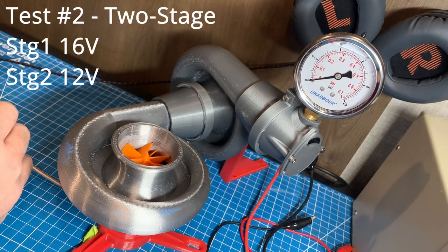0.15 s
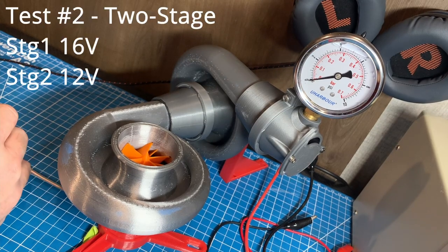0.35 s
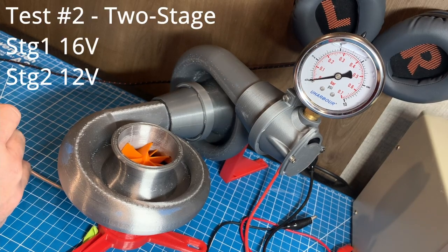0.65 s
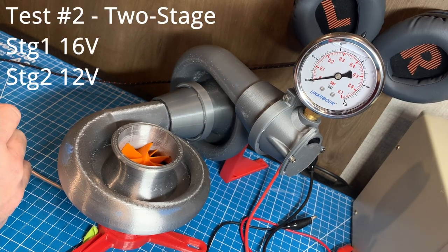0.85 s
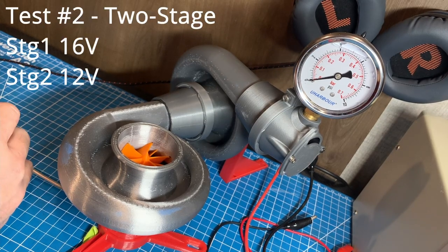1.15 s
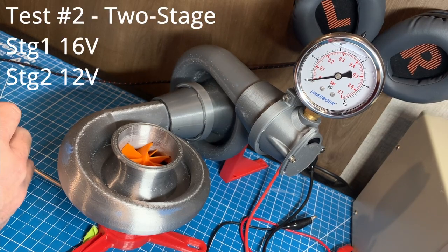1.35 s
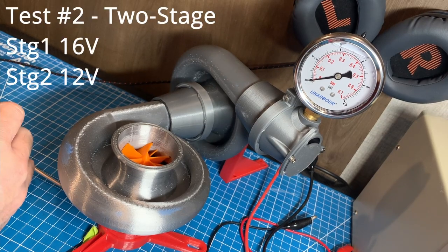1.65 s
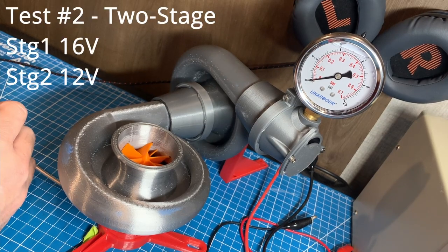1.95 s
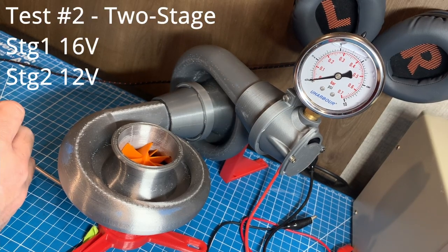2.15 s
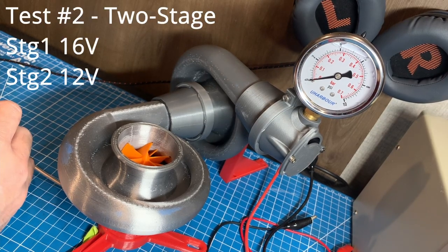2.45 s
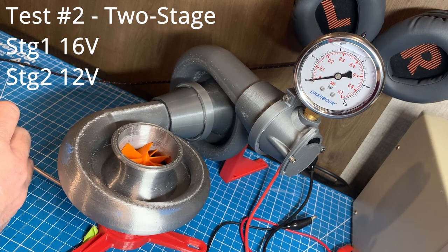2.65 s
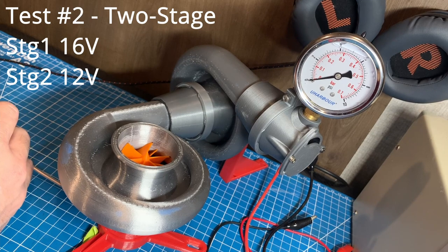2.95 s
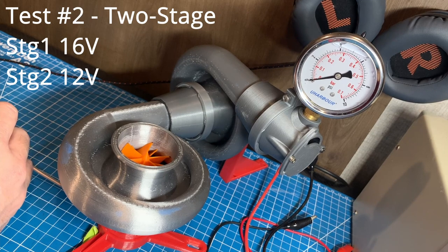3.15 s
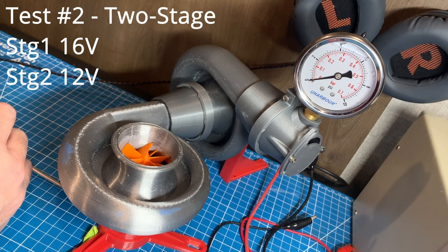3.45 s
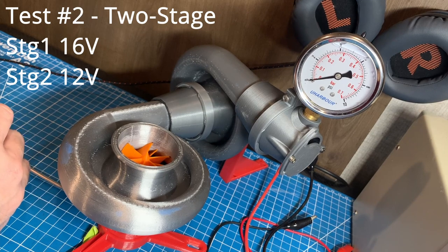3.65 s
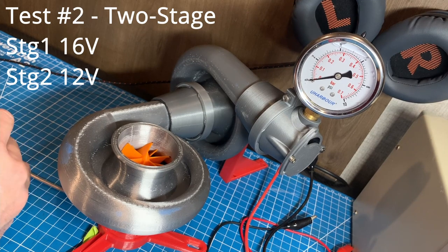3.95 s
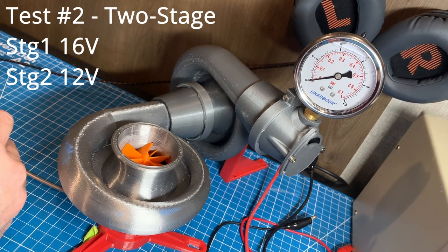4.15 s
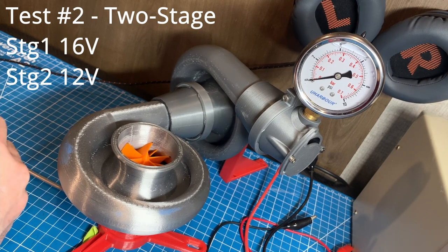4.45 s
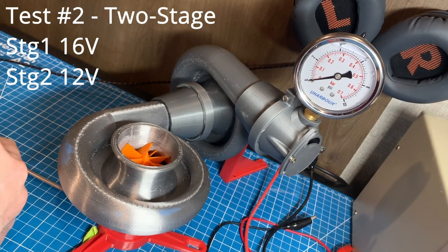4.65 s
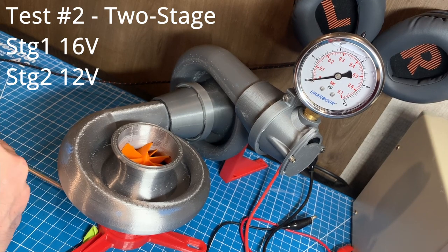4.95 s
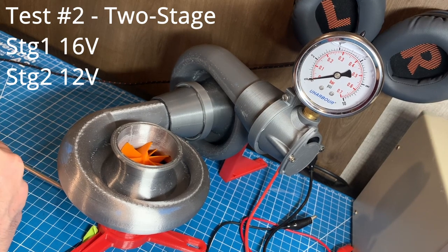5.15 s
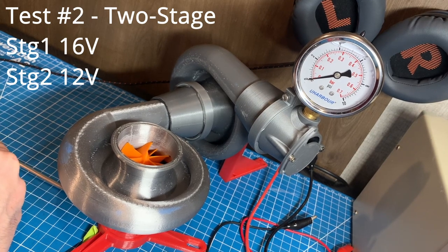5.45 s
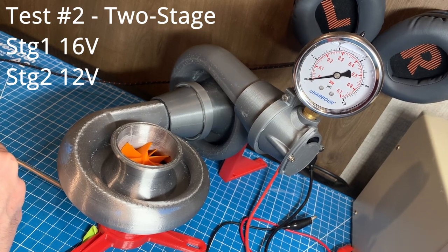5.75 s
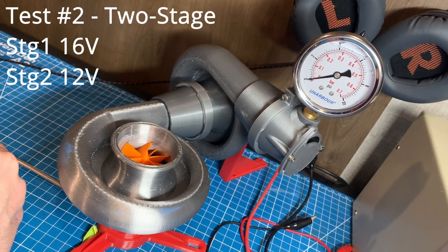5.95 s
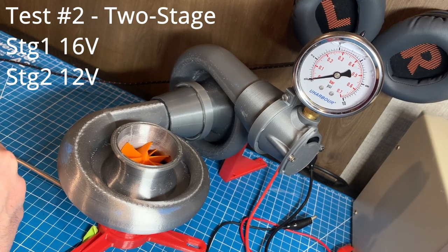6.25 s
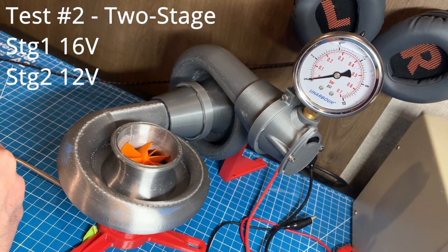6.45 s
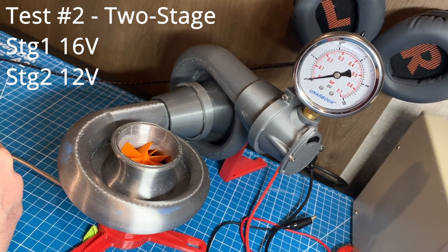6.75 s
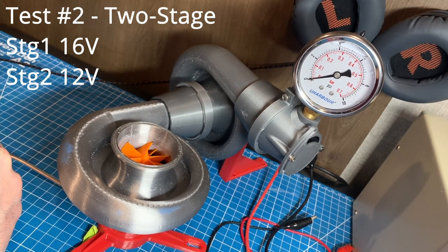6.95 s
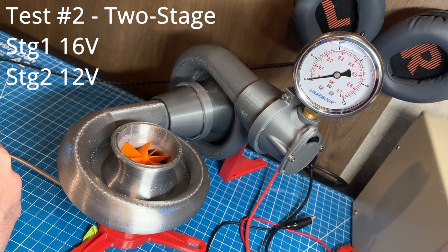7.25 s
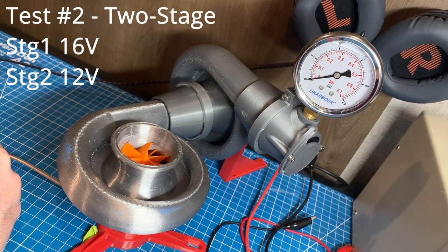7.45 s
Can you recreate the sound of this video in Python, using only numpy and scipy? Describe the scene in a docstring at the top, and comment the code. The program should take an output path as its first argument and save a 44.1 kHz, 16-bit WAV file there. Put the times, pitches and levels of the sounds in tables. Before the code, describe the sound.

Close and dry, in mono: a fast-spinning motor and impeller rise smoothly from near silence to a constant drone. Hum and layered whining sit over hissing, slightly hollow airflow, peppered with tiny rapid metallic ticks and very short dropouts in the hiss. After five seconds the pitch stays put but the whine surges brighter, a loose part buzzes briefly, then it eases back and keeps running to the end.

```python
"""Two-stage compressor on a desk

A home-made two-stage centrifugal compressor runs almost steadily, fading in over two seconds; one microphone
channel, with no distance or room added. The faster shaft hums and whines on its multiples, the other stage
adds weak tones, and filtered noise makes the air rush through the housings, with a rough warble. Faint quick
ticks ring on top; the whine swells and a buzz joins it for about a second, and the rush drops out now and then."""
import sys
import numpy as np
from scipy import signal
from scipy.fft import rfft, irfft
from scipy.io import wavfile

SR = 44100
rng = np.random.default_rng(int(sys.argv[2]) if len(sys.argv) > 2 else 0)


def master(y):
    """Save y as 16-bit WAV."""
    cut = np.clip(np.atleast_2d(y).T, -1, 1)
    pcm = np.round(cut * 32767)  # scale
    wavfile.write(sys.argv[1], SR, pcm.astype(np.int16))


N = 335160
T = np.arange(N) / SR

# Rush of air, shape of its spectrum. Each row: frequency in Hz, relative density in dB.
AIR = [(40, -38), (60, -28), (110, -23), (165, -15.5), (330, -14), (570, -17), (1050, -13.5), (1700, -20.5),
       (2900, -23.5), (5000, -25), (7700, -25.5), (8600, -21), (11000, -21.5), (13300, -27), (15800, -24.5)]
# Resonances of the housings and the pipe between them. Each row: frequency in Hz, width in Hz, relative peak in dB.
HOUSING = [(163, 25, -7), (228, 30, -12), (411, 25, -8), (672, 45, -5), (745, 45, -4), (802, 28, -4.5),
           (1040, 45, -6), (1105, 40, -10), (1235, 40, -13), (1440, 70, -14), (1545, 50, -14),
           (1885, 70, -13), (2090, 70, -22), (2270, 55, -18), (2390, 70, -21), (2560, 90, -20),
           (3000, 70, -18), (3930, 200, -26), (4280, 120, -23), (4620, 130, -27), (5250, 170, -26),
           (5650, 220, -26), (6500, 160, -24), (8740, 250, -20.5), (10940, 160, -18), (14280, 350, -23)]
# Brief drop-outs of the rush. Each row: centre in seconds, length in seconds, depth in the treble in dB.
DROPS = [(0.152, 0.012, 15), (0.814, 0.011, 18), (1.006, 0.011, 15), (1.059, 0.028, 23), (1.176, 0.009, 17),
         (2.115, 0.01, 17), (2.287, 0.01, 17), (2.328, 0.01, 15), (2.562, 0.013, 17), (2.734, 0.011, 15),
         (2.872, 0.026, 29), (2.925, 0.008, 19), (3.075, 0.011, 16), (3.117, 0.01, 16), (3.363, 0.028, 25),
         (3.566, 0.012, 15), (3.832, 0.025, 28), (3.928, 0.013, 16), (4.654, 0.012, 17), (5.272, 0.012, 18),
         (5.656, 0.01, 14), (5.743, 0.01, 14), (5.858, 0.031, 22), (6.059, 0.013, 14), (6.231, 0.011, 14),
         (6.318, 0.01, 14), (6.509, 0.011, 18), (6.616, 0.008, 18), (6.765, 0.009, 16), (6.839, 0.029, 18),
         (6.936, 0.009, 13), (7.0, 0.01, 16), (7.426, 0.01, 14), (7.502, 0.044, 29)]
# Level of the warble. Each row: time in seconds, level in dB.
WARBLE = [(1, -45.5), (2.2, -52.5), (2.53, -45.5), (2.75, -50), (3.05, -45.5), (3.17, -52), (3.4, -47.5),
          (4.9, -47), (4.968, -39), (5.005, -63), (5.1, -49), (5.75, -45), (5.96, -51), (6.2, -42),
          (6.32, -51), (6.44, -41.5), (6.6, -47), (7.6, -46)]
# Tones of the other stage. Each row: frequency in Hz, level in dB, unsteadiness in Hz.
TONES = [(184, -61, 4), (481, -55, 4), (1437, -69, 6), (2272, -70, 8), (2391, -70.5, 6), (2998, -67, 7),
         (3951, -73, 8), (4269, -69, 8), (6503, -72, 10)]
# Ticks with their own levels, mostly the stronger ones; faint ticks fill the time between. Each row: start in
# seconds, relative level in dB.
TICKS = [(0.082, 2.5), (0.341, -2), (0.383, 4), (0.473, 0), (0.648, 3), (0.689, -4), (0.853, -1),
         (0.983, -1), (1.207, 1.5), (1.296, 3), (1.336, 0), (1.516, -2), (1.686, -1), (1.818, 2),
         (2.049, 1), (2.091, -3), (2.177, 2), (2.267, 0), (2.402, 0), (2.538, 0), (2.583, -2), (2.625, 0),
         (2.795, 3), (2.839, 2.5), (3.146, -2), (3.189, 5.5), (3.32, -2), (3.495, 0), (3.541, 1),
         (3.592, -2), (3.681, 0), (3.86, 0), (3.905, 0), (3.989, -3), (4.03, -2), (4.077, -1), (4.208, -1),
         (4.252, 2), (4.296, 1), (4.466, 1), (4.513, -3), (4.558, -3), (4.6, -6), (4.856, -1), (5.069, -3),
         (5.113, 0), (5.159, 0), (5.246, -2), (5.337, -4), (5.472, 0), (5.553, -4), (5.682, 3), (5.81, 2),
         (5.902, 3), (5.989, 0), (6.032, 1), (6.167, 2), (6.208, 2), (6.3, 0), (6.343, -2), (6.389, 0),
         (6.432, -1), (6.599, 1), (6.643, 1), (6.689, 0), (6.734, 0.5), (6.859, -4), (6.903, 0), (7.125, 1),
         (7.168, 2), (7.254, 2), (7.553, -0.5)]
# What the ticking rings with. Each row: frequency in Hz, 60 dB decay time in seconds, relative level in dB.
TICK_MODES = [(4400, .003, -2), (5700, .010, -5), (7200, .002, -1), (8750, .010, 3.5), (11500, .002, 6),
              (14200, .003, 7.5)]
# What the buzz rings with. Each row: frequency in Hz, 60 dB decay time in seconds, relative level in dB.
BUZZ_MODES = [(2200, .007, -5), (3050, 0.0052, 33), (4230, 0.0046, 29), (4900, 0.0073, -21),
              (10800, .003, 5)]
# Hum of the unbalanced shaft, before its trim. Each row: time in seconds, level in dB.
HUM = [(1.4, -36), (2.2, -35.5), (3.75, -35.5), (4.12, -34.5), (4.3, -36.5), (4.5, -33), (4.9, -34),
       (5.15, -36), (5.5, -34.5), (5.95, -36.5), (6.3, -36), (7.6, -35)]
# Brief jolts of the hum. Each row: centre in seconds, rise in dB.
JOLTS = [(1.38, 4.5), (1.637, 7.5), (1.86, 2), (3.868, 5), (4.03, 2.5), (4.125, 2.5), (4.285, 5.5),
         (5.345, 3.5), (5.498, 4.5), (5.63, 4)]
# Whine lines, before their trim. Each row: multiple of the shaft speed, level in dB,
# change once the shaft has settled in dB, change at full swell in dB.
WHINE = [(2, -68, 1, 0), (5, -54, -1, 2), (7, -59, -4, 6), (10, -70, -10, 9), (11, -73, -1, 6),
         (12, -70, 0, 2), (13, -66, 1, 5), (17, -80, -3, 14), (18, -81, 5, 5), (20, -64, 1, -7),
         (21, -74, -2, 9), (22, -69, -5, -1), (23, -69, 4, 3), (24, -69, -1, 0), (25, -62, -1, 4),
         (26, -62, -14, 4), (27, -63, 5, -3), (28, -59, 0, 0), (29, -62, -4, -13), (30, -57, 0, -1),
         (31, -63, 2, 0), (32, -66, -3, 4), (33, -70, -1, 3), (34, -59, -1, 6), (35, -65, -3, 7),
         (36, -70, 8, 4), (37, -72, 4, 1), (38, -70, 8, 1), (39, -63, -3, 2), (40, -71, 1, 4),
         (41, -68, -2, -1), (44, -66, -2, 1), (45, -67, 5, 2), (46, -72, 2, 0), (47, -65, 1, 2),
         (48, -61, -2, 1)]
# Leading whine lines, which swell and fade in turn, before their trim; each is named for its multiple
# of the shaft speed. Each row: time in seconds, level in dB.
THIRD = [(1, -59), (3.4, -58), (3.8, -54), (4.3, -56.5), (4.75, -49), (5.05, -59), (5.27, -42),
         (5.7, -48.5), (6.1, -50.5), (6.4, -59.5), (7.6, -58)]
FOURTH = [(1, -55.5), (2.2, -58.5), (3.8, -57.5), (5.05, -62), (5.25, -48), (5.7, -49.5), (6.15, -51.5),
          (6.4, -63), (7.6, -65)]
SIXTH = [(1, -53), (2.9, -52.5), (4.9, -53.5), (5.35, -64), (5.65, -62), (5.9, -55.5), (6.3, -59)]
EIGHTH = [(1, -54), (2.8, -57), (4.9, -58.5), (5.75, -53), (6.4, -64)]
NINTH = [(1, -56), (2, -54), (4.5, -59.5), (5.45, -53.5), (6, -63), (6.25, -55), (7.6, -57)]
FOURTEENTH = [(1.3, -57), (3.6, -59.5), (4.85, -74), (5.15, -55.5), (5.75, -62), (6, -60), (6.25, -57),
              (7, -58), (7.6, -66)]
FIFTEENTH = [(1, -59), (3.4, -74), (3.9, -77), (4.8, -77), (5.15, -61), (5.5, -73), (5.72, -53), (6, -64),
             (7, -62.5), (7.6, -67)]
SIXTEENTH = [(2, -65), (3, -71), (4.5, -63.5), (5.7, -70), (5.9, -56.5), (6.15, -65), (6.35, -62),
             (6.8, -66), (7.6, -62)]
# The leading lines together. Each row: multiple of the shaft speed, level curve.
LEADERS = [(3, THIRD), (4, FOURTH), (6, SIXTH), (8, EIGHTH), (9, NINTH), (14, FOURTEENTH), (15, FIFTEENTH),
           (16, SIXTEENTH)]

# the shaft sags a little from its first speed, then holds (turns per second)
START_HZ, SAG_HZ_PER_S, SETTLED_HZ = 318.76, 0.15, 318.03
# when the shaft settles under its load, and how long that takes (s)
SETTLE_AT_S, SETTLE_S = 3.34, 0.62
# the whine surges once, and a share of the surge lingers
SURGE_AT_S, SURGE_ATTACK_S, SURGE_HOLD_S, SURGE_RELEASE_S = 5.03, 0.12, 0.33, 0.91
LINGER_SHARE = 0.68
# straight fade-in from a small opening (share 0-1)
FADE_S, OPENING = 2.31, 0.045
JOLT_S = 0.01
TICK_HZ = 22.85  # ticks per second
TOP_HZ = 15700


def undb(db):
    """Decibels to gain."""
    return 10 ** (np.asarray(db) / 20)


def curve(rows):
    """Rows of (s, value) joined by straight lines."""
    return np.interp(T, *np.transpose(rows))


def unit(x):
    """Scale to rms 1."""
    return x / np.sqrt(np.mean(x ** 2))


def noise(gain_at):
    """Noise of rms 1 whose spectrum follows a function of frequency."""
    hz = np.arange(N // 2 + 1) * SR / N + 1e-3  # kept off zero for logarithms
    spectrum = rfft(rng.standard_normal(N))
    return unit(irfft(spectrum * gain_at(hz), N))


def walk(rate_hz):
    """Slow chance of spread 1, with little above the given rate."""
    return noise(lambda hz: 1 / (1 + (hz / rate_hz) ** 2))


def throb(rate_hz):
    """Chance of spread 1 that swings at about the given rate."""
    return noise(lambda hz: 1 / (1 + (2 * np.log(hz / rate_hz)) ** 4))


def turns_of(hz):
    """Turns made so far at a moving speed."""
    return np.cumsum(hz) / SR


def split(x, edge_hz=3050):
    """The parts of a sound below and above an edge."""
    low = signal.sosfiltfilt(signal.butter(8, edge_hz, fs=SR, output="sos"), x)
    return low, x - low


def bell(x):
    """Smooth bump of height 1 from a squared or steeper distance."""
    return np.exp(-np.minimum(x, 20))


def ring_of(modes):
    """Twenty milliseconds of a struck part's ring: a sum of dying sines."""
    age = T[:SR // 50]
    ring = 0
    for hz, t60, db in modes:
        decay = np.exp(-np.log(1000) * age / t60)
        ring = ring + undb(db) * decay * np.sin(2 * np.pi * hz * age)
    return ring


def settled():
    """How far the shaft has settled under its load, 0-1."""
    return np.clip((T - SETTLE_AT_S) / SETTLE_S, 0, 1)


def swell_of(rest=0):
    """Strength of the surge, 0-1: it rises, holds and falls back to a resting share."""
    rise = np.clip((T - SURGE_AT_S) / SURGE_ATTACK_S, 0, 1)
    fall = np.clip((T - SURGE_AT_S - SURGE_ATTACK_S - SURGE_HOLD_S) / SURGE_RELEASE_S, 0, 1)
    return rise * np.maximum(1 - fall, rest)


def drop_outs(stretch=1):
    """Depth in dB of the rush's drop-outs, flat-bottomed with soft edges."""
    depth = 0
    for s, length, depth_db in DROPS:
        distance = 2 * (T - s) / (stretch * length)
        depth = np.maximum(depth, depth_db * bell(distance ** 4))
    return depth


def rush(turns, air_db=-45.5, ring_db=-47.0):
    """Turbulent air hisses and rings the housings; the impeller chops the hiss once a turn."""
    points_hz, points_db = np.transpose(AIR)

    def air_gain(hz):
        low_cut = hz / np.hypot(hz, 55)
        return undb(np.interp(np.log(hz), np.log(points_hz), points_db)) * low_cut

    def housing_gain(hz):
        return sum(undb(db) / (1 + (2 * (hz - f) / width) ** 2) for f, width, db in HOUSING)

    body, hiss = split(undb(air_db) * noise(air_gain) + undb(ring_db) * noise(housing_gain))
    flow = undb(0.3 * walk(5))
    chop = 1 + 0.29 * np.cos(2 * np.pi * turns)
    return flow * body, flow * hiss * chop


def warble(centre_hz=720, spread_hz=30, wobble_hz=36, beads_db=3.0, beads_hz=30):
    """The flow through the volute sings a rough note that wobbles in pitch and comes in quick beads."""
    tone = np.sin(2 * np.pi * turns_of(centre_hz + spread_hz * walk(wobble_hz)))
    beads = undb(beads_db * throb(beads_hz))
    return undb(curve(WARBLE)) * unit(tone * beads)


def other_stage(waver_db=3.0):
    """The other stage sings a few weak tones, unsteady in level and pitch."""
    out = 0
    for hz, db, unsteady_hz in TONES:
        strength = undb(db + waver_db * walk(16))
        out = out + strength * np.sin(2 * np.pi * turns_of(hz + unsteady_hz * walk(20.1)))
    return np.sqrt(2) * out


def ticking(tick_db=-38, burst_s=0.0012, crack_db=10):
    """Something loose in the drive ticks nearly evenly; each tick is a tiny scrape into a few modes."""
    faint_db, tail_share, tail_s = -5, 0.45, 0.005
    hits = np.zeros(N)
    ends = [row[0] for row in TICKS[1:]] + [T[-1]]
    for (s, db), next_s in zip(TICKS, ends):
        # faint ticks fill the time up to the next listed one
        count = max(round((next_s - s) * TICK_HZ), 1)
        beats = np.linspace(s, next_s, count, endpoint=False)
        hits[(beats * SR).astype(int)] = undb(faint_db)
        hits[int(s * SR)] = undb(db)
    age = T[:SR // 50]
    contact = np.exp(-np.square(age / burst_s)) + tail_share * np.exp(-age / tail_s)
    contact = contact / np.sqrt(np.sum(contact ** 2))
    scrape = signal.fftconvolve(hits, contact)[:N] * rng.standard_normal(N)
    crack = split(scrape, edge_hz=7800)[1]
    ringing = signal.fftconvolve(scrape, ring_of(TICK_MODES))[:N]
    return undb(tick_db) * (ringing + undb(crack_db) * crack)


def buzz(turns, swell, buzz_db=-53, scatter_db=4):
    """In the swell a loose part chatters against the housing on every second turn."""
    taps = np.diff(np.floor(turns / 2), prepend=0) * undb(scatter_db * rng.standard_normal(N))
    chatter = unit(signal.fftconvolve(taps, ring_of(BUZZ_MODES))[:N])
    return undb(buzz_db) * swell * chatter


def hum(turns, drop_db, trim_db=1.0, flutter=0.12, flutter_hz=45, sway=0.088, drop_share=0.071):
    """The unbalanced rotor shakes the desk once a turn; the tone flutters, throbs and jolts now and then."""
    jolt_db = sum(db * bell(np.square((T - s) / JOLT_S)) for s, db in JOLTS)
    # the sign turns over as the shaft settles, so the throb rests briefly on the way
    throb_db = (-0.83 + 1.53 * settled()) * throb(11)
    level_db = curve(HUM) + trim_db + jolt_db + throb_db - drop_share * drop_db
    strength = undb(level_db) * (1 + flutter * walk(flutter_hz))
    return np.sqrt(2) * strength * np.sin(2 * np.pi * turns + sway * walk(flutter_hz))


def whine(turns, drop_db, trim_db=-0.6, leading_db=-0.47, wander_db=-0.2, flicker_db=2.0, bared_db=3.5):
    """Blades and commutator sound on shaft multiples; load and surge shift their balance, each wavers."""
    faint_db, chance_db, full_drop_db, low_order = -62, 4, 12, 9
    waver_db = wander_db * walk(1.1) + flicker_db * walk(18.6)
    load, swell = settled(), swell_of(LINGER_SHARE)
    lines = []
    for order, db, load_db, swell_db in WHINE:
        lines.append((order, trim_db + db + load_db * load + swell_db * swell))
    for order, rows in LEADERS:
        lines.append((order, leading_db + curve(rows)))
    drop_times = np.array(DROPS)[:, 0]
    drop_samples = (drop_times * SR).astype(int)
    nearest_drop = np.searchsorted((drop_times[1:] + drop_times[:-1]) / 2, T)
    bared = bared_db * np.minimum(drop_db / full_drop_db, 1)
    out = 0
    for order, line_db in lines:
        start, shift = rng.random(), rng.integers(N)
        # low lines and a few strong ones, picked anew by chance, stand out in a gap; the rest drop out too
        stays = line_db[drop_samples] + chance_db * rng.standard_normal(len(DROPS)) > faint_db
        gap_db = np.where(stays[nearest_drop] | (order <= low_order), bared, -drop_db)
        # each line takes the same wavering from its own place
        strength = undb(line_db + np.roll(waver_db, shift) + gap_db)
        out = out + strength * np.sin(2 * np.pi * (order * turns + start))
    return np.sqrt(2) * out


def scene(whine_rise=0.94, hum_rise=0.97, low_share=0.1, mid_stretch=0.63):
    """Rush, ticking, hum and whine fade in together, the whine a little ahead."""
    speed_hz = np.maximum(START_HZ - SAG_HZ_PER_S * T, SETTLED_HZ)
    turns = turns_of(speed_hz + 0.1 * walk(15) + 0.1 * walk(1))
    drop_db = drop_outs()
    body, hiss = rush(turns)
    low, mid = split(body + other_stage() + warble(), edge_hz=860)
    # the drop-outs are as deep in the middle as in the treble but shorter, and barely touch the lows
    air = low * undb(-low_share * drop_db) + mid * undb(-drop_outs(mid_stretch))
    air = air + (hiss + ticking()) * undb(-drop_db)
    fade = np.minimum(OPENING + T / FADE_S, 1)
    rotor = fade ** hum_rise * hum(turns, drop_db) + fade ** whine_rise * whine(turns, drop_db)
    chatter = buzz(turns, swell_of()) * undb(-drop_db)
    return (rotor + chatter + fade * air)[None]


def record(dry):
    """The recorder cuts the top with a steep low-pass."""
    return signal.sosfilt(signal.ellip(12, 0.1, 80, TOP_HZ, fs=SR, output="sos"), dry)


dry = scene()
out = record(dry)
master(out)
```